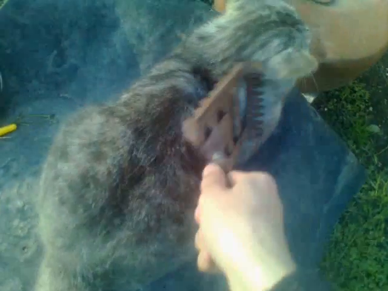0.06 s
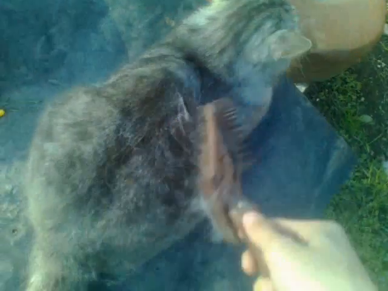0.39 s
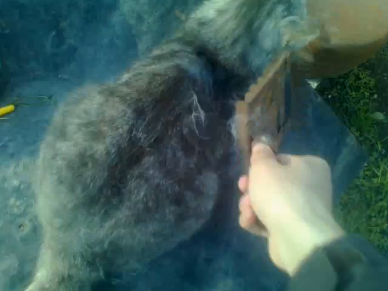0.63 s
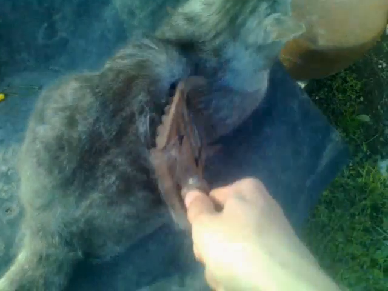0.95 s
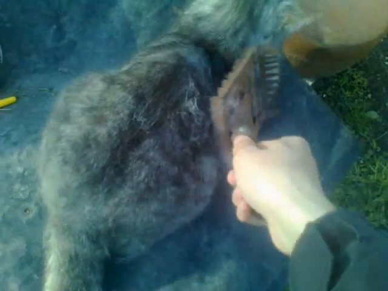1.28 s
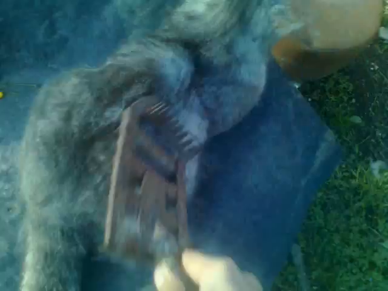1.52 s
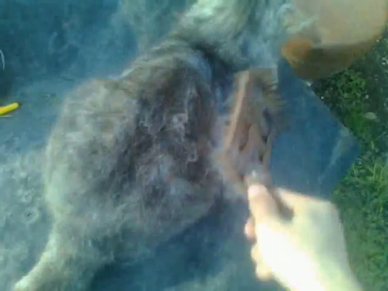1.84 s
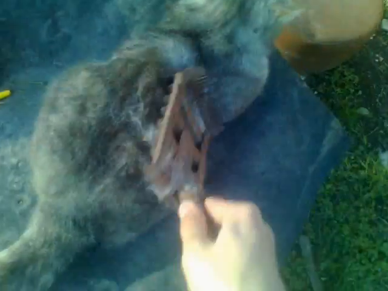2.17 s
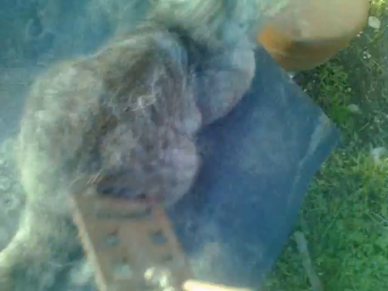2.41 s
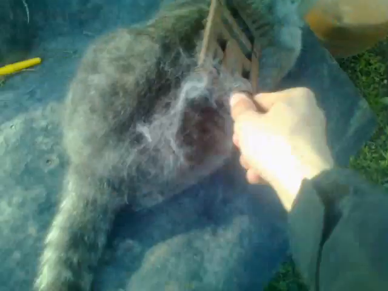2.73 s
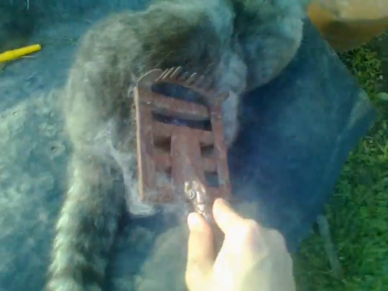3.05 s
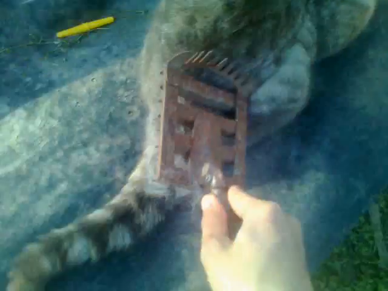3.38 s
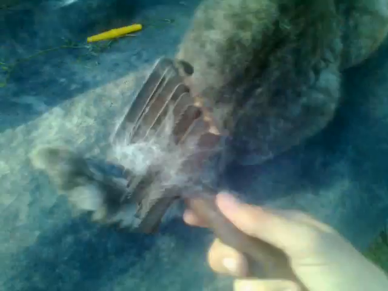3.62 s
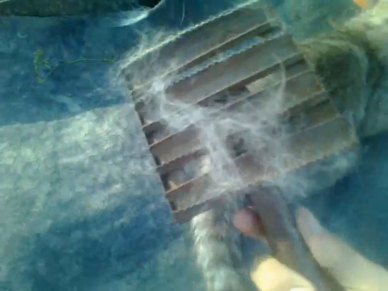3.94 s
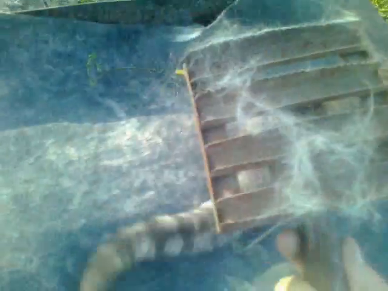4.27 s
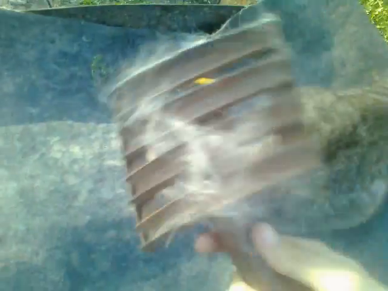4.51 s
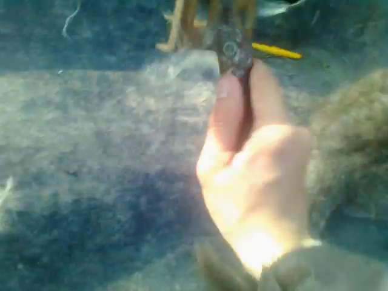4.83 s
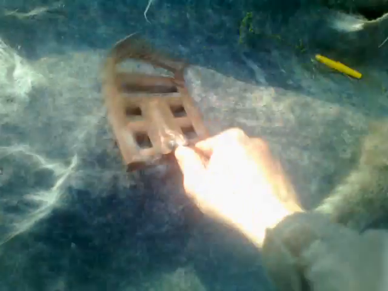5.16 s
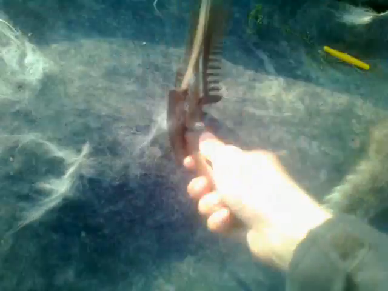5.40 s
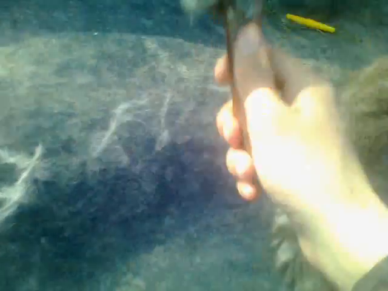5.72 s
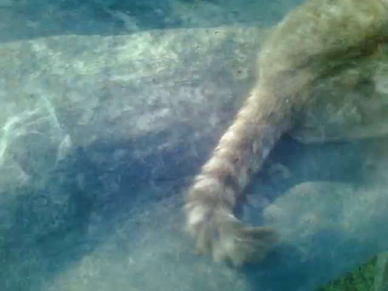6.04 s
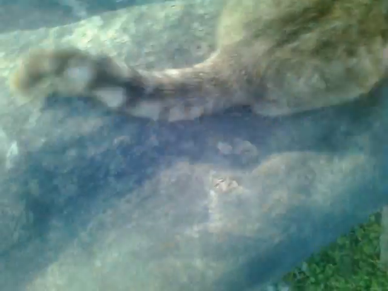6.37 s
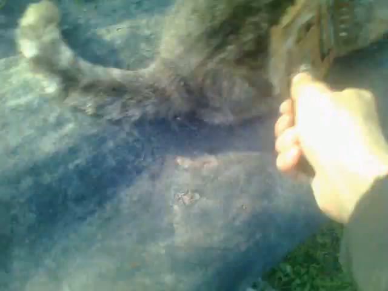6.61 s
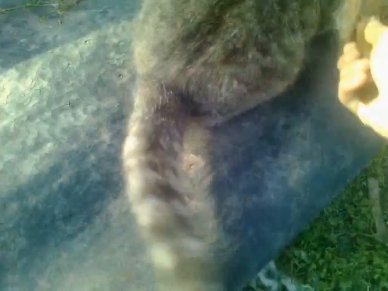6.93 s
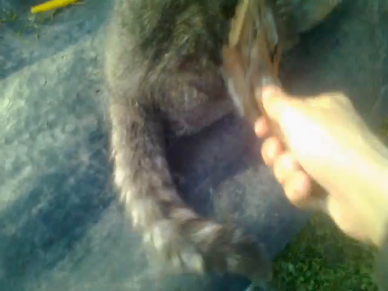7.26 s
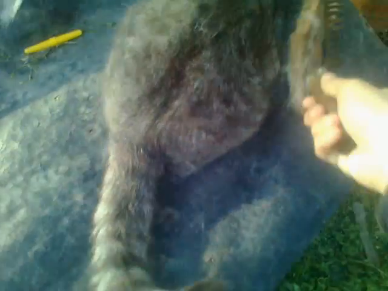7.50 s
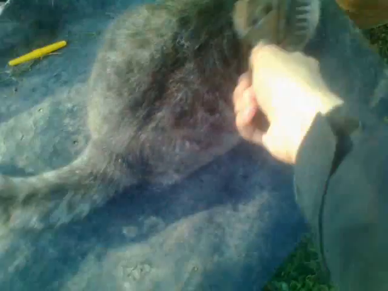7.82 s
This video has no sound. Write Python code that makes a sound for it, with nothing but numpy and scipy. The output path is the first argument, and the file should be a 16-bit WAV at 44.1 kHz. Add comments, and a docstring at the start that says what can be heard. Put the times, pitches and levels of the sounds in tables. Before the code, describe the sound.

Faint, scratchy strokes of a steel comb through fur, broken by three sharp, ringing knocks, over light wind and distant birds.

```python
"""A steel curry comb rakes through a cat's fur outdoors: snagging hairs make its toothed blades ring softly,
and it brushes back between strokes. Three times it is knocked on the panel under the cat to shed loose fur; the
panel thuds, the steel rings, and the camera's gain control ducks and creeps back. A soft rush of air with a low
drone and a whistle that rises and falls comes first; light wind, rustling and far birds lie underneath."""
import sys
import numpy as np
from scipy import signal
from scipy.fft import rfft, irfft, next_fast_len
from scipy.io import wavfile
from scipy.ndimage import uniform_filter1d, minimum_filter1d, map_coordinates

SR = 44100
rng = np.random.default_rng(int(sys.argv[2]) if len(sys.argv) > 2 else 0)


def transcribe(u):
    """Save the signal u as a 16-bit wav file named by the first command-line argument.

    u: samples, shape (n,) or (channels, n), limited to [-1, 1]; the rate is SR.
    q: integer samples, one column per channel.
    """
    v = np.clip(np.atleast_2d(u).T, -1, 1)
    q = np.round(v * 32767).astype(np.int16)
    wavfile.write(sys.argv[1], SR, q)


N = 351918
TIME = np.arange(N) / SR


def amp(db):
    """Turn decibels into a gain."""
    return 10 ** (np.asarray(db) / 20)

def unit(x):
    """Scale a sound to an average (rms) size of 1."""
    return x / np.sqrt(np.mean(x ** 2) + 1e-20)

def along(points, hz):
    """Read between (frequency, value) points on a log frequency axis."""
    f, v = np.transpose(points)
    return np.interp(np.log(hz + 1), np.log(f + 1), v)

def wobble(rate):
    """A smooth random curve through `rate` points a second."""
    return map_coordinates(rng.standard_normal(int(N * rate / SR) + 4), [TIME * rate])

def swell(middle, half):
    """A bell-shaped rise and fall of gain."""
    return np.exp(-((TIME - middle) / half) ** 2)

def filtered(x, response):
    """Scale and delay each frequency of x as `response` says."""
    size = next_fast_len(len(x) + SR // 2)
    return irfft(rfft(x, size) * response(np.fft.rfftfreq(size, 1 / SR)), size)[:len(x)]

def coloured(x, spectrum):
    """Give x the tone colour of a spectrum, at rms 1."""
    return unit(filtered(x, lambda hz: amp(along(spectrum, hz))))

def band(hz, width_hz):
    """A band of noise around a pitch, at rms 1."""
    phase = 2 * np.pi * np.cumsum(hz * np.ones(N)) / SR
    return unit(wobble(width_hz) * np.cos(phase) + wobble(width_hz) * np.sin(phase))

def impulse(spectrum, size):
    """The sharpest click that starts at time zero and has this spectrum."""
    levels_db = along(spectrum, np.fft.rfftfreq(size, 1 / SR))
    cepstrum = irfft(np.log(amp(levels_db)), size)
    cepstrum[1:size // 2] *= 2
    cepstrum[size // 2 + 1:] = 0
    return irfft(np.exp(rfft(cepstrum)), size)

def shaped(x, spectrum):
    """Colour a hit without smearing any sound ahead of it."""
    return signal.fftconvolve(x, impulse(spectrum, len(x)))[:len(x)]

def snags(rate):
    """Hairs catch and slip: about `rate` tiny, uneven clicks a second."""
    return (rng.random(N) < rate / SR) * rng.laplace(size=N)

def ring(modes, t, scatter_db):
    """A struck object's own tones (modes), each a little random in level and falling 60 dB in t60."""
    return sum((-1) ** k * amp(db + scatter_db * rng.standard_normal() - 60 * t / t60)
               * np.sin(2 * np.pi * hz * t) for k, (hz, db, t60, *_) in enumerate(modes))

def add(track, s, sound):
    """Mix a sound in at s seconds."""
    part = track[round(s * SR):][:len(sound)]
    part += sound[:len(part)]


# Wind strength, one list before the knocks and one after: t/s, level/dB
BREEZE = [
    [(0.0, -49), (0.34, -52), (2.25, -59), (2.7, -55), (3.77, -63), (4.37, -53.5), (5.05, -59)],
    [(6.2, -54), (6.456, -63), (6.57, -55.5), (7.002, -56.5), (7.468, -55), (7.79, -57), (7.98, -55.5)],
]
# Puffs of air: t/s, level/dB
PUFFS = [(1.86, -42), (2.28, -52), (2.86, -49), (4.29, -47.5), (4.55, -45), (6.46, -42)]
# The wind's tone colour: f/Hz, level/dB
WIND_COLOUR = [(15, -15), (35, -2.5), (65, -3.5), (100, -7), (160, -13), (300, -27.5), (800, -59.5)]

def wind(boost_db=2.0):
    """A breeze and a few short puffs rumble on the microphone."""
    breeze = amp(np.interp(TIME, *np.vstack(BREEZE).T) + boost_db + 2.2 * wobble(19))
    puffs = sum(amp(db) * swell(s, half=0.01) for s, db in PUFFS)
    return np.hypot(breeze, puffs) * coloured(rng.standard_normal(N), WIND_COLOUR)

# Rustle strength, one list before the knocks and one after: t/s, level/dB
RUSTLE_LEVELS = [
    [(0.0, -56), (0.67, -62), (1.11, -55), (1.76, -62.5), (2.43, -55.5), (3.47, -64), (3.84, -59),
     (4.77, -67), (5.05, -57.5)],
    [(6.2, -61), (6.452, -60), (6.858, -62.5), (7.38, -58), (7.692, -58), (7.98, -60.5)],
]
# The rustle's tone colour: f/Hz, level/dB
RUSTLE_COLOUR = [(80, -22.5), (170, -3), (350, 0), (600, -4), (1000, -10), (2000, -19), (4000, -24),
                 (9000, -36.5)]

def rustle(boost_db=0.5):
    """Sleeve and fur shift, and their tiny clicks blur into a soft rustle."""
    level_db = np.interp(TIME, *np.vstack(RUSTLE_LEVELS).T) + boost_db + 1.7 * wobble(22)
    return amp(level_db) * coloured(snags(rate=5500), RUSTLE_COLOUR)

# The hiss's tone colour: f/Hz, level/dB
HISS_COLOUR = [(100, 3.5), (1500, 0), (3300, -4), (4000, -1), (4400, 1.5), (4900, -4), (7000, -4),
               (8000, -5), (12000, -6.5), (16000, -9.5)]

def hiss(level_db=-66):
    """A faint, steady hiss lies under everything."""
    return amp(level_db) * coloured(rng.standard_normal(N), HISS_COLOUR)

# The whistle in the rush of air: t/s, f/Hz, level/dB
WHISTLE = [(0, 1600, -58), (0.129, 1860, -50), (0.35, 2200, -54.5), (0.458, 2120, -71), (0.6, 1900, -84),
           (0.75, 1720, -61), (0.86, 1600, -93)]
# The tone colour of rushing air: f/Hz, level/dB
RUSH_COLOUR = [(100, -24), (400, -28), (700, -11), (1100, -2), (2000, -4), (2600, -14), (4000, -16.5),
               (8000, -33), (15000, -41)]

def air_rush(rush_db=-52, drone_db=-45, hum_db=-56):
    """A soft rush of air swells and dies, with a low drone, a faint hum and a whistle that rises and falls."""
    s, hz, db = np.transpose(WHISTLE)
    whistle = amp(np.interp(TIME, s, db, right=-120)) * band(np.interp(TIME, s, hz), width_hz=150)
    strength = swell(middle=0.3, half=0.58)
    rush = strength * amp(rush_db) * coloured(rng.standard_normal(N), RUSH_COLOUR)
    drone = amp(drone_db) * swell(middle=0.46, half=0.25) * band(58, width_hz=8.03)
    hum = strength ** 2 * amp(hum_db) * band(1045, width_hz=40.2)
    return whistle + drone + rush + hum

def stroke(start, length, release, attack=0.089, sag_db_per_s=6.5, fade_db=27):
    """One stroke's gain swells as the teeth sink in, eases as the fur gives way, then fades."""
    t = TIME - start
    outside = np.maximum(-t / attack, 0) + np.maximum((t - length) / release, 0)
    return amp(-fade_db * outside - sag_db_per_s * np.clip(t, 0, length))

# The steel comb's own tones: f/Hz, struck level/dB, ring time t60/s, raked level/dB
COMB_MODES = [(915, -4, 0.24, -7), (1108, -12, 0.45, 0), (1187, -11.5, 0.385, -9.5),
              (1345, -13.5, 0.3, 2.5), (1375, -9, 0.19, -8), (1510, -18, 0.11, -15.5),
              (1558, -16, 0.5, -6.5), (1730, -25, 0.18, -10), (1840, -10, 0.18, -2),
              (2084, -15.5, 0.21, -3.5), (2221, 9, 0.074, 5.5), (2390, -14, 0.34, -0.5),
              (2420, -20, 0.16, -2), (2606, -20.5, 0.27, 7.5), (2920, -19, 0.51, -12),
              (3084, -31.5, 0.14, -6), (3270, -29, 0.26, -2.5), (3420, -20, 0.27, -11),
              (3610, -24, 0.4, -2), (3890, -21.5, 0.46, -8.5), (4180, -25.5, 0.18, -4.5),
              (4540, -26, 0.42, -9.5), (4920, -19, 0.22, -8), (4970, -44, 0.22, -10),
              (5770, -29, 0.22, -13), (5920, -45, 0.24, -9.5), (6440, -48.5, 0.62, -11),
              (7190, -49, 0.45, -12), (7600, -37.5, 0.3, -25)]
# Strokes, timed from when the teeth are fully in:
# t/s, pull length/s, ring level/dB, bite (rasp against ring)/dB, swish level/dB, release/s
STROKES = [(0.345, 0.23, -51.5, -4, -62, 0.037), (0.987, 0.23, -51, -5.5, -57, 0.13),
           (1.727, 0.12, -49.5, -3, -59.5, 0.09), (2.408, 0.16, -52.5, -2, -58, 0.13),
           (3.151, 0.098, -51.5, 0, -61, 0.24), (3.502, 0.21, -61, -1.5, -63, 0.05),
           (6.78, 0.17, -48.5, -5, -54, 0.1), (7.438, 0.11, -49, -4.5, -57.5, 0.17)]

def raking(blades=5, width_hz=18, widening=0.0044, scrape_db=-24, grip_db=3, tangle_db=1.63):
    """Snagging hairs set the blades ringing, the fur damps them, and the blades take turns to grip."""
    pull = amp(1.2 * wobble(35))
    scrape = lambda f: amp(scrape_db) * (f / 2500) ** 2 / (1 + (f / 2500) ** 2) / (1 + (f / 7500) ** 8)
    steel = filtered(pull * snags(rate=8400), scrape)
    for blade in range(blades):
        modes = [(hz, width_hz + widening * hz, db) for hz, _, _, db in COMB_MODES[blade::blades]]
        resonance = lambda f: sum(amp(db) * 1j * f * width / (hz * hz - f * f + 1j * f * width)
                                  for hz, width, db in modes)
        grip = amp(grip_db * wobble(9))
        steel += filtered(pull * grip * snags(rate=4000), resonance)
    steel /= np.sqrt(np.abs(uniform_filter1d(steel ** 2, size=4000)))  # the blades share one pull
    low = filtered(steel, lambda f: 1 / (1 + (f / 2950) ** 16))
    body, rasp = unit(low), unit(steel - low)
    # teeth that bite deeper rasp more brightly
    out = sum(amp(db) * stroke(s, length, release) * (body + amp(bite_db) * rasp)
              for s, length, db, bite_db, _, release in STROKES)
    return out * amp(tangle_db * wobble(25))

# The comb's back brushing the coat between strokes: middle t/s, level/dB
RETURNS = [(0.86, -58.5), (1.52, -63), (2.145, -54), (2.85, -63), (3.85, -63), (6.52, -64.5), (6.68, -61.5),
           (7.24, -55), (7.835, -51.5)]
# The tone colour of swishing hair: f/Hz, level/dB
HAIR_COLOUR = [(300, -1.5), (800, -3.5), (2000, -5), (4000, -11), (6500, -17.5), (10000, -17),
               (13000, -17.5), (16000, -25.5)]

def brushing(uneven_db=2.3):
    """Fur swishes along the steel, on the stroke and on the way back."""
    forth = sum(amp(db) * stroke(s, length, release) for s, length, _, _, db, release in STROKES)
    back = sum(amp(db) * swell(s, half=0.058) for s, db in RETURNS)
    return (forth + back) * amp(uneven_db * wobble(40)) * coloured(snags(rate=12000), HAIR_COLOUR)

# Short rubs: middle t/s, half length/s, centre f/Hz, level/dB
SCUFFS = [(0.594, 0.062, 800, -52), (1.023, 0.36, 627, -56), (1.262, 0.017, 695, -49),
          (2.595, 0.054, 1300, -54.5), (3.702, 0.04, 597, -57), (3.955, 0.089, 745, -58.5),
          (4.49, 0.022, 479, -52.5), (6.15, 0.03, 550.5, -54.5), (6.347, 0.033, 480, -52.5),
          (7.4, 0.056, 400, -56.5)]

def scuffs():
    """Sleeve and paws rub briefly, each rub a dull, wide band of noise."""
    return sum(amp(db) * swell(s, half) * band(hz, width_hz=0.75 * hz) for s, half, hz, db in SCUFFS)

# The clearer bird chirps: t/s, f/Hz, level/dB
CHIRPS = [(.82, 4380, -61), (2.08, 4700, -61), (2.67, 3830, -63), (2.97, 3730, -59), (3.85, 3780, -59),
          (4.2, 4170, -62.5), (4.87, 4350, -64), (6.44, 4450, -67)]

def birds(chatter_db=-73.5, chirp_s=0.054, arch=0.056, blur_db=4):
    """Small, far birds chirp up and down in pitch over faint chatter, blurred by distance."""
    out = np.zeros(N)
    progress = np.linspace(-1, 1, int(chirp_s * SR))
    chatter = rng.normal([0, 4400, chatter_db], [0, 200, 2], size=(170, 3))  # same columns as CHIRPS
    chatter[:, 0] = rng.uniform(chirp_s, N / SR - chirp_s, len(chatter))
    for s, hz, db in [*CHIRPS, *chatter]:
        pitch = hz * (1 + arch * (1 / 4 - progress ** 2) + 0.24 * rng.standard_normal(len(progress)))
        tone = np.sin(2 * np.pi * np.cumsum(pitch) / SR)
        add(out, s - chirp_s / 2, amp(db) * np.cos(progress * np.pi / 2) * tone)
    return out * unit(amp(blur_db * wobble(120)))

# Light taps of the comb: t/s, tick level/dB, ring level/dB
TAPS = [(4.482, -65.5, -88), (5.272, -52.5, -59), (5.313, -58, -70), (5.567, -62, -82.5), (5.828, -54, -75),
        (6.397, -69.5, -66)]
# A tick's tone colour: f/Hz, level/dB
TICK_COLOUR = [(100, -2), (450, 4.5), (1000, -1), (2500, -17.5), (4500, -18.5), (8000, -35.5), (15000, -37)]

def taps(t60=0.05):
    """The comb touches lightly: a dull tick with a trace of ringing."""
    out, t = np.zeros(N), np.arange(SR // 3) / SR
    for s, tick_db, ring_db in TAPS:
        burst = rng.standard_normal(len(t)) * amp(-60 * t / t60)
        tick = unit(shaped(burst, TICK_COLOUR))
        add(out, s, amp(tick_db) * tick + amp(ring_db) * ring(COMB_MODES, t, scatter_db=1.5))
    return out

def bent(x, travel_s):
    """A wave bending through the panel spreads out: 1 kHz takes travel_s, treble less, bass more."""
    return filtered(x, lambda f: np.exp(-4j * np.pi * travel_s * np.sqrt(1000 * f)))

# How long the clatter takes to die away: f/Hz, t60/s
CLATTER_T60 = [(70, 0.35), (200, 0.33), (600, 0.1), (1500, 0.055), (4000, 0.087), (12000, 0.068)]
# The clatter's tone colour: f/Hz, level/dB
CLATTER_COLOUR = [(40, -5), (80, 6.5), (250, 0), (700, -2), (1300, -2.5), (2600, -15), (4000, -10),
                  (5500, -18), (8000, -30), (15000, -47.5)]

def clatter(t):
    """The hit panel clatters: a burst of noise whose bass lasts longest."""
    hz, frame_s, noise = signal.stft(rng.standard_normal(len(t)), SR, nperseg=128)
    decay = amp(-60 * frame_s / along(CLATTER_T60, hz)[:, None])
    dying = signal.istft(noise * decay, SR, nperseg=128)[1][:len(t)]
    return unit(shaped(dying, CLATTER_COLOUR))

# The panel's own tones: f/Hz, level/dB, t60/s
PANEL_MODES = [(119.7, -16, 0.16), (166.4, -3.5, 0.17), (223.7, 2, 0.1), (287.6, 1.5, 0.076),
               (360, -2.5, 0.042), (389.5, -13.5, 0.078), (564, -12, 0.12), (646, -11.5, 0.065),
               (760, -20, 0.044)]
# The tone colour of the first sharp crack: f/Hz, level/dB
CRACK_COLOUR = [(60, 10), (250, 16.5), (700, 17.5), (1300, 11), (2600, -7), (4000, -6.5), (5500, -41.5),
                (8000, -46.5), (15000, -52.5)]

def panel_hit(t, mid_db, treble_db, crack_db=-22, clatter_db=-30, thud_db=-6, echo_db=-6):
    """A knock sends a crack, a clatter and a thud through the panel as bending waves."""
    crack = amp(crack_db) * unit(impulse(CRACK_COLOUR, len(t)))
    panel = bent(crack + amp(clatter_db) * clatter(t), travel_s=0.0024)
    # the thud builds from waves that come back from the edges
    thud = amp(thud_db) * ring(PANEL_MODES, t, scatter_db=4.5) * (1 - np.exp(-t / 0.00096))
    panel += bent(thud, travel_s=0.003514)
    # the crack returns once from the far edge, duller and more spread out
    echo = filtered(crack, lambda f: 1 / (1 + 1j * f / 1100) ** 3)
    panel += amp(echo_db) * bent(echo, travel_s=0.0048)
    # each spot on the panel has its own tone colour
    return shaped(panel, [(250, 0.00098), (420, mid_db), (700, mid_db), (1300, treble_db)])

def teeth(t, count=110, low_hz=1300, high_hz=15000, t60=0.53, db_per_octave=-4):
    """The many small teeth jangle with closely spaced tones; the higher ones die sooner."""
    pitches = low_hz * (high_hz / low_hz) ** (rng.random(count) ** 0.7)
    modes = [(hz, db_per_octave * np.log2(hz / low_hz), t60 * np.sqrt(low_hz / hz)) for hz in pitches]
    return ring(modes, t, scatter_db=3.5)

def comb_hit(t, favoured_hz, damping_db_per_s, favour_db=12, teeth_db=-24, build_s=0.019):
    """The knocked comb rings and chatters as the hand damps it; each edge favours a different tone."""
    favour = lambda hz: favour_db * np.exp(-(np.log(hz / favoured_hz) / 0.024) ** 2)
    modes = [(hz, db + favour(hz), t60) for hz, db, t60, _ in COMB_MODES]
    steel = ring(modes, t, scatter_db=4.5) + amp(teeth_db) * teeth(t)
    chatter_db = 1.3 * wobble(150)[:len(t)]
    return steel * (1 - np.exp(-t / build_s)) * amp(chatter_db - damping_db_per_s * t)

# Knocks on the panel: t/s, level/dB, panel mid-range/dB, panel treble/dB, comb ring/dB,
# favoured comb tone f/Hz, damping by the hand/(dB/s)
KNOCKS = [(5.158, 0, -1, -1.5, 1, 1110, 85), (5.3878, 4, -3.5, 2, 1.5, 5770, 71),
          (5.6685, 6, -0.5, -6.5, -7, 4920, 108)]

def knocks(comb_db=-16.5):
    """The comb hits the panel, and both sound at once."""
    out, t = np.zeros(N), np.arange(SR // 2) / SR
    for s, db, mid_db, treble_db, ring_db, favoured_hz, damping in KNOCKS:
        panel = panel_hit(t, mid_db, treble_db)
        steel = amp(comb_db + ring_db) * comb_hit(t, favoured_hz, damping)
        add(out, s, amp(db) * (panel + steel))
    return out

def scene():
    """All the sounds add up in open air, in one channel."""
    grooming = raking() + brushing() + knocks() + taps() + scuffs()
    return (grooming + birds() + air_rush() + wind() + rustle() + hiss())[None]

def gain_control(x, ceiling_db=-4, recovery_db_per_s=18):
    """The gain drops at once for a loud peak, then creeps back."""
    recovered_db = recovery_db_per_s * TIME
    excess_db = np.maximum(20 * np.log10(np.abs(x) + 1e-9) - ceiling_db, 0)
    cut_db = np.maximum.accumulate(excess_db + recovered_db) - recovered_db
    return x * uniform_filter1d(minimum_filter1d(amp(-cut_db), size=65), size=65)

def record(dry):
    """The camera turns down loud peaks and cuts off the highest treble."""
    return filtered(gain_control(dry[0]), lambda hz: hz < 15750)[None]


dry = scene()
out = record(dry)
transcribe(out)
```